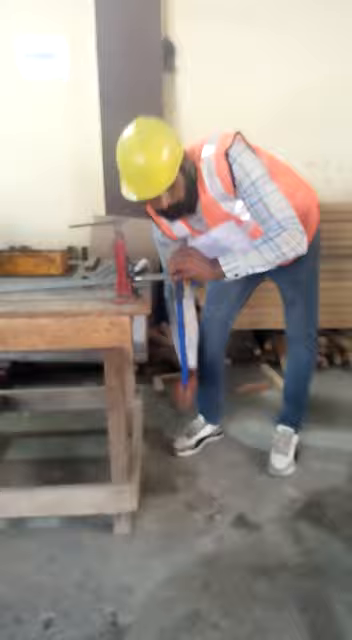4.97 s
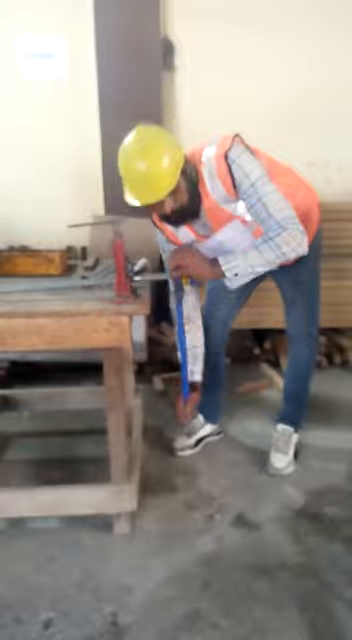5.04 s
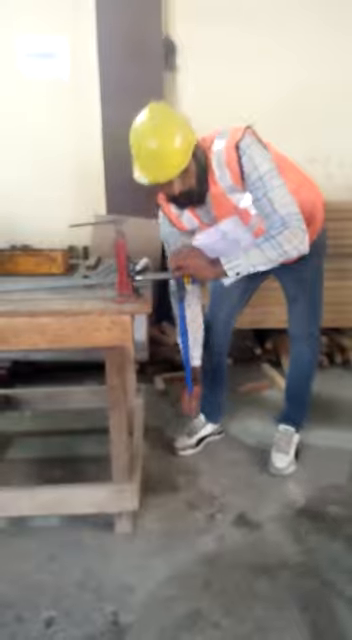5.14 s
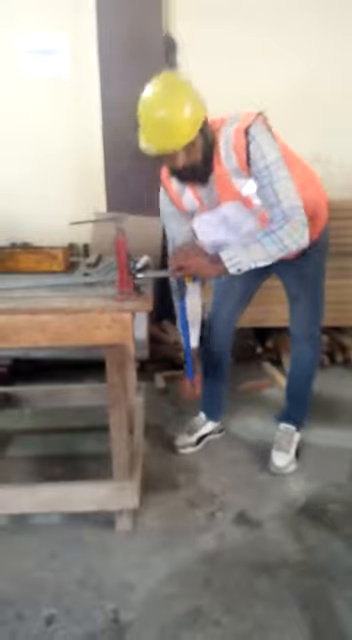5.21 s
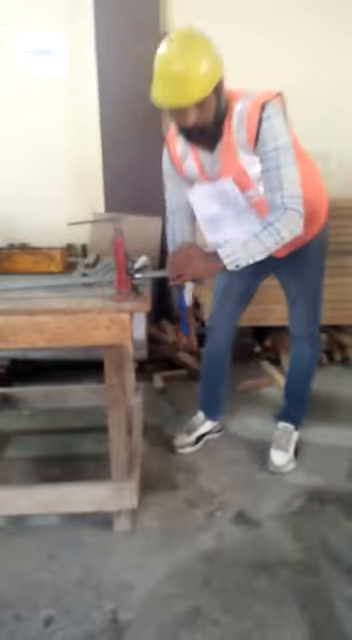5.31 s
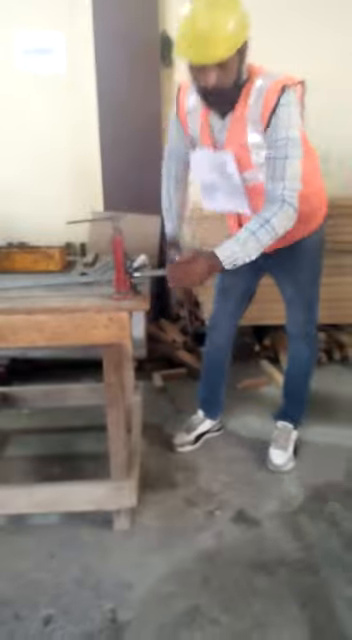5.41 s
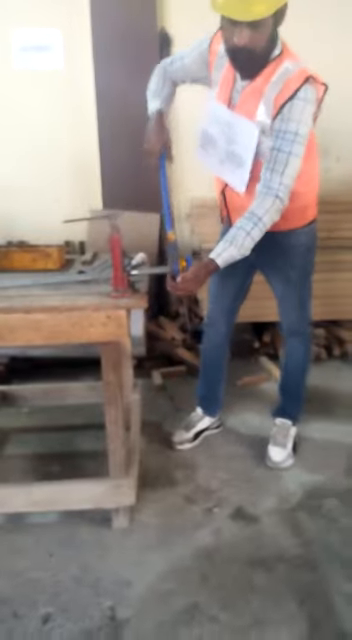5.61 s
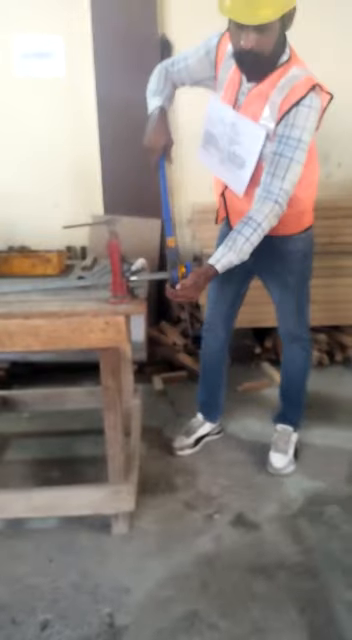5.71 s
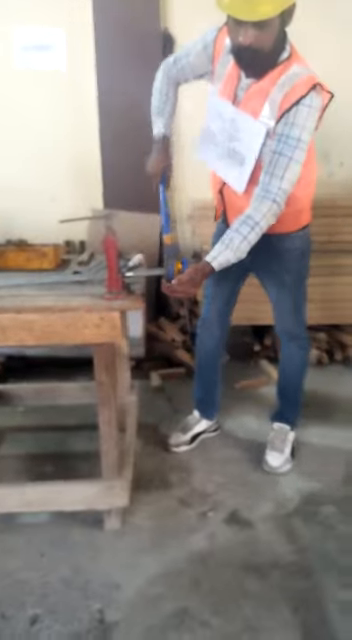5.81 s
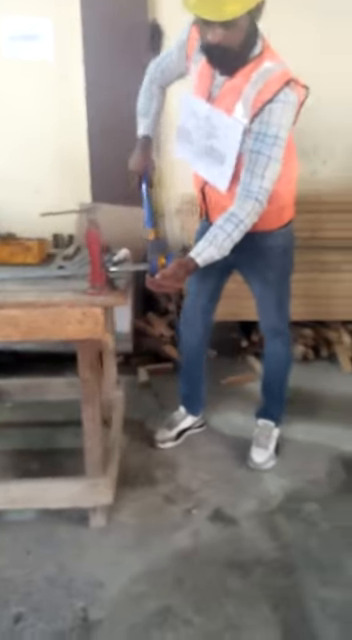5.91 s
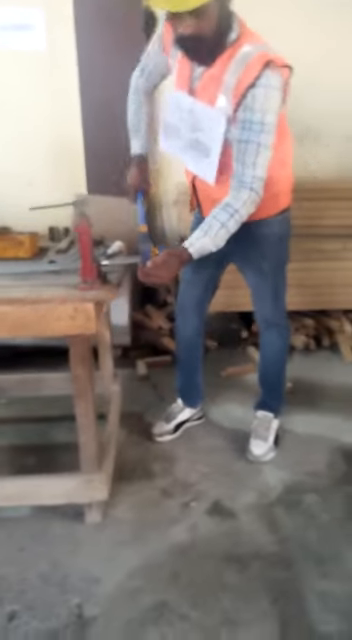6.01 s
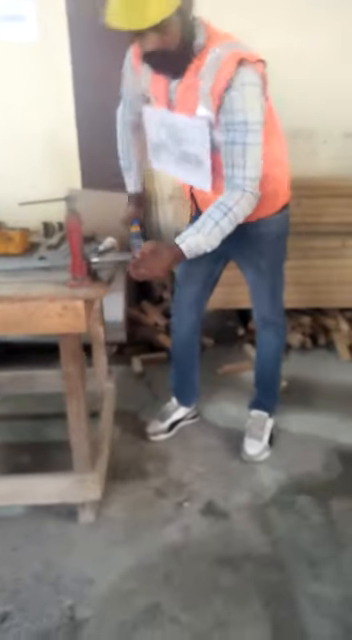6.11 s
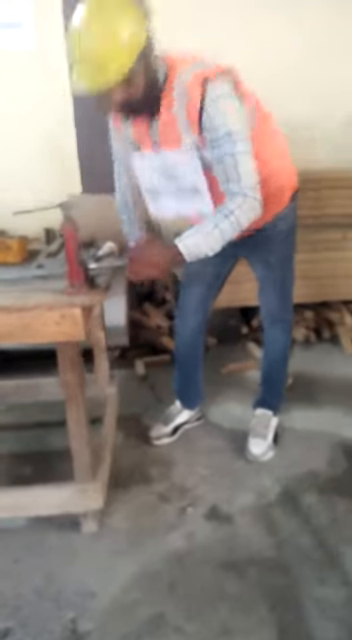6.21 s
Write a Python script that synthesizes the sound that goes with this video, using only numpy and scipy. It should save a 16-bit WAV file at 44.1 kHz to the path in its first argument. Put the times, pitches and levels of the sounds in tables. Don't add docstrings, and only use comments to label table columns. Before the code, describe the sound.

A hand ratchet die stock threads a clamped metal pipe in a hard, reverberant workshop, captured by a phone whose noise suppression leaves only a low, dull shop murmur. At 0 s a snap's echo fades; light ticks and a soft knock come at 0.25-0.35 s, then a faint rasp with chip hiss around 0.65-0.9. Four loud, crisp metal snaps fall at 1.16-1.46, a thin knock at 1.7, a faint cut at 2.05-2.35. Small creaks lead to four snaps at 2.62-2.95, a fuller knock at 3.13 and the longest, weakest rasp at 3.66-4.0. Three snaps follow at 4.12-4.3, ticks and a firm knock at 4.6-4.68, a short rasp at 4.95-5.2. Four final snaps sound at 5.45-5.76, then the heaviest, deepest knock at 5.94, with bench rumble fading. Snaps dominate; vise and pipe hum hollowly after every blow.

```python
import sys
import numpy as np
from scipy import signal
from scipy.fft import rfft, irfft, next_fast_len
from scipy.io import wavfile
from scipy.ndimage import uniform_filter1d

SR = 44100
rng = np.random.default_rng(int(sys.argv[2]) if len(sys.argv) > 2 else 0)


def inscribe(sig):
    pcm = np.round(np.clip(np.atleast_2d(sig).T, -1, 1) * 32767)
    wavfile.write(sys.argv[1], SR, pcm.astype(np.int16))


def to_linear_factor(level_db):
    exponent = np.asarray(level_db, float) / 20
    return 10 ** exponent


N = 276507

# [t/s, peak level/dB, low band/dB, high band/dB, middle band/dB]
SNAP_EVENTS = [(1.1573, -3, -0.5, -9, -13.5), (1.2441, -6, -5, -9, -18.5), (1.3423, -8.5, -12, -17, -21),
               (1.4551, -4.5, -11, -11, -15.5), (2.617, -8, -6.5, -9.5, -17),
               (2.7112, -6.5, -14.5, -10, -18.5), (2.8125, -6, -13.5, -11.5, -17.5),
               (2.9532, -6.5, -23.5, -16.5, -20.5), (4.1158, -4, -9, -13, -15.5),
               (4.2058, -4.5, -3.5, -12, -15), (4.2986, -8.5, -14, -12.5, -18.5),
               (5.4495, -2, -5, -15, -14), (5.5378, -7.5, -9, -8, -16), (5.6361, -8.5, -4.5, -6.5, -12),
               (5.7608, -4.5, -4, -8, -12)]
FIRST_SNAP = [(-.013, -8, -7, -9, -12)]
# [f/Hz, level per Hz/dB]
SHOP_SPECTRUM = [(45, 0.5), (95, 4), (320, 5), (1000, -3.5), (1600, -5), (2100, -13.5), (3200, -17),
                 (4200, -26), (6900, -30.5), (7500, -12), (8700, -12), (9900, -22.5), (10300, -29.5),
                 (14500, -37.5)]
# [f/Hz, attenuation/dB]
SUPPRESSION = [(250, 8), (1000, 11), (3000, 14)]
# [t/s, length/s, pitch of the dies over the usual/ratio]
STROKES = [
    (.65, .27, 1.003),
    (2.05, .3, .99),
    (3.66, .36, 1.02),
    (4.95, .25, 1.004),
]
PUSH_DB = [1.5, 0.5, -4, 1]


def unit(x):
    return x / np.sqrt(np.mean(x ** 2) + 1e-20)


def along(points, hz):
    f, v = np.transpose(points)
    return np.interp(np.log(hz + 1), np.log(f + 1), v)


def smooth(x, size):
    return uniform_filter1d(uniform_filter1d(x, size=size), size=size)


def noise(response):
    m = next_fast_len(N + 8192)
    spectrum = rfft(rng.standard_normal(m)) * response(np.fft.rfftfreq(m, 1 / SR))
    return unit(irfft(spectrum, m)[:N])


def causal(gain_db):
    cepstrum = irfft(gain_db * np.log(10) / 20)
    cepstrum[1:1024] *= 2
    cepstrum[1025:] = 0
    pulse = irfft(np.exp(rfft(cepstrum)))
    return pulse / np.linalg.norm(pulse)


def echo():
    # [f/Hz, t60/s]
    walls = [(1000, 0.64), (3000, 0.7), (7000, 0.71), (14000, 0.96)]
    hz, t, z = signal.stft(rng.standard_normal(SR * 2 // 3), SR, nperseg=256)
    decay = to_linear_factor(-60 * t / along(walls, hz)[:, None])
    tail = signal.istft(z * decay, SR, nperseg=256)[1]
    t = np.arange(len(tail)) / SR
    tail *= 1 - np.exp(-(t / 0.0065) ** 2)
    tail *= 1 + 1.5 * np.exp(-t / 0.014)
    return tail / np.linalg.norm(tail)


def blows(table, colour, gain_db, room_db, t60, bounce, bright_db, edge_hz=None):
    crack_t60_s, crack_share, mode_scatter_db = .0028, 2.3, 1.8
    out = np.zeros(N + 2 * SR)
    t, hz = np.arange(1024) / SR, np.fft.rfftfreq(2048, 1 / SR)
    usual = np.mean(table, axis=0)
    for s, db, low_db, high_db, wet_db, last in table:
        low_db, high_db = low_db - usual[2], high_db - usual[3]
        if edge_hz:
            lowest_hz, middle_db = edge_hz, last - usual[5]
        else:
            lowest_hz, middle_db = last, high_db / 2
        tilt = [(1500, low_db), (2400, 0.013), (3800, middle_db / 4), (5400, middle_db),
                (7200, high_db), (11000, high_db / 2)]
        modes_db = mode_scatter_db * unit(smooth(rng.standard_normal(len(hz)), 19))
        shape_db = along(colour, hz) + along(tilt, hz) + modes_db
        shape_db -= 10 * np.log10(1 + (lowest_hz / (hz + 50)) ** 24)
        shape_db += 5.5 * np.exp(-((hz - 7350) / 450) ** 2)

        envelope = to_linear_factor(-60 * t / t60) + crack_share * to_linear_factor(-60 * t / crack_t60_s)
        rattle = rng.standard_normal(len(t)) * envelope
        rattle[130:] += bounce * rattle[:-130]
        near_db = shape_db + bright_db * np.log2(hz / 3000 + 0.046)
        near_db += 6 * np.log2(hz / 9500 + .01).clip(0)
        direct = signal.fftconvolve(rattle / np.linalg.norm(rattle), causal(near_db))
        answer = to_linear_factor(room_db + wet_db) * signal.fftconvolve(echo(), causal(shape_db))

        out[round((s + .027) * SR) + SR // 2:][:len(direct)] += to_linear_factor(db + gain_db - 12) * direct
        for sound in (direct, answer):
            out[round(s * SR) + SR // 2:][:len(sound)] += to_linear_factor(db + gain_db) * sound
    return out[SR // 2:][:N]


def ratchet():
    # [t/s, peak level/dB, high band/dB, room/dB, lowest f/Hz]
    play = [(0.2511, -31.5, -1, 1.5, 2660), (0.3039, -28.5, -3, -2.5, 2050),
            (0.7948, -46.5, -3.5, -2.5, 7400), (1.0876, -33.5, 1.5, -2, 3320), (2.275, -52, 1.5, -15, 4800),
            (2.498, -47, -15.5, 2, 3400), (2.5529, -36, 6, -4, 4850), (3.9294, -58, 11, 10.5, 5480),
            (4.0526, -35.5, 4, -1.5, 3300), (4.08, -43.5, 9.5, -13, 5130), (4.102, -39.5, -9.5, 0, 1890),
            (4.625, -38, -4.5, 7, 3030), (4.6043, -30.5, 0, -1, 2310), (4.6441, -34.5, 11, -18.5, 3050),
            (5.3825, -35, 0.5, -2, 3180)]
    # [t/s, peak level/dB, low band/dB, high band/dB, lowest f/Hz]
    slack = [
        (0.3449, -25, -4.5, -1.5, 1980),
        (1.688, -24, 1, -4.5, 2000),
        (3.1303, -22, 1.5, -1, 1188),
        (4.676, -21, 3, 0.5, 1950),
        (5.9351, -18, 14.5, -2, 962),
    ]
    # [f/Hz, level per Hz/dB]
    pawl = [(410, -31), (700, 0), (861, -13), (1160, -33), (1290, 3), (1560, -3), (1950, 1.5), (2190, -3),
            (2830, -0.5), (3670, -3.5), (4460, -10), (6240, -12), (7190, -13), (8510, -16.5),
            (15400, -47.5)]
    # [f/Hz, level per Hz/dB]
    handle = [(1000, -19), (1900, -7), (2350, -0.5), (2620, 2.5), (2950, -5), (3600, -9.5), (4600, -18),
              (7500, -18), (10500, -28.5), (16000, -63.5)]
    snap_rows = [(s, db, low, high, -8 - 0.6 * db, middle)
                 for s, db, low, high, middle in list(FIRST_SNAP) + list(SNAP_EVENTS)]
    tick_rows = [(s, db, 0, *rest) for s, db, *rest in play]
    knock_rows = [(s, db, low, high, 0, lowest) for s, db, low, high, lowest in slack]
    snaps = blows(snap_rows, pawl, gain_db=14.5, room_db=4.5, t60=0.015, bounce=.55, bright_db=1.0, edge_hz=1150)
    ticks = blows(tick_rows, pawl, gain_db=23.0, room_db=0.0, t60=0.032, bounce=0.6, bright_db=1.2)
    knocks = blows(knock_rows, handle, gain_db=17.0, room_db=5.5, t60=0.013, bounce=0.37, bright_db=2.5)
    return snaps + ticks + knocks


def jolts():
    # [t/s, top/dB, vise/dB, pipe/dB, growth/(dB/s)]
    swings = [
        (-.1, -32.5, -32.5, -27, 8),
        (1.1, -35, -33, -37, 17.5),
        (2.549, -48, -42, -49, 29.5),
        (4.05, -44, -38, -33, 23.5),
        (5.4, -32.5, -31.5, -31.5, 2),
    ]
    # [t/s, legs/dB, top/dB, vise/dB, pipe/dB]
    thuds = [
        (0.347, -31, -37.5, -31, -41.5),
        (1.71, -65.5, -36, -41.5, -55),
        (3.138, -41.5, -32.5, -30.5, -32.5),
        (4.685, -41.5, -30.5, -27.5, -30),
        (5.938, -24, -28, -24.5, -34),
    ]
    # [t/s, level/dB, place from legs 0 to pipe 3, t60/s]
    nudges = [(.25, -43, 1.1, .3), (0.442, -39.5, .1, 0.36), (.985, -46.5, 0.92, .2),
              (1.04, -49.5, 1.95, 1), (1.09, -39.5, 2.05, 0.95), (1.13, -23, 1.5, 0.41),
              (1.37, -34, 0.89, .35), (1.55, -31, 1.74, 0.79), (1.62, -32, 1.97, 0.5), (2.63, -31, 1.1, .2),
              (2.72, -28.5, 2, .4), (2.82, -31, 2.0, 0.88), (2.975, -35.5, 2.4, 0.2), (1.785, -38, 1, 0.57),
              (1.92, -56, 1.2, 0.17), (1.95, -53, 0.047, 0.27), (2.489, -52.5, 1.2, 0.26),
              (2.58, -39.5, 2.4, 0.54), (3.23, -31, 1.7, .3), (4.0, -46, 1.8, 0.98),
              (4.601, -40.5, 2.2, .5), (4.78, -40, 6.4, 0.9), (5.285, -45, 2.4, 0.39),
              (5.294, -40.5, 0.061, 0.31), (5.348, -35.5, 1, 0.41), (5.389, -41, 2.7, 0.7),
              (6.04, -24.5, 0.35, .3), (6.09, -41, 1.4, .2), (6.15, -41, 0.75, 1)]
    snap_rise_s = [0.055, 0.0084, 0.0097, 0.013]
    snap_t60_s = [0.16, 0.43, 0.7, 0.56]
    thud_rise_s = [0.011, 0.016, 0.022, 0.016]
    thud_t60_s = [0.37, 0.5, 0.43, 0.52]
    reach_db, legs_under_top_db = 17, 24
    rows = [(s, db, thud_rise_s, thud_t60_s) for s, *db in thuds]
    for s, db, where, t60 in nudges:
        rows.append((s, db - reach_db * np.abs(np.arange(4) - where), [.014], [t60]))
    for s, *_ in list(FIRST_SNAP) + list(SNAP_EVENTS):
        start, top_db, vise_db, pipe_db, growth = [swing for swing in swings if swing[0] < s][-1]
        db = np.array([top_db - legs_under_top_db, top_db, vise_db, pipe_db]) + growth * (s - start)
        rows.append((s, db, snap_rise_s, snap_t60_s))
    return rows


def bench():
    # [f/Hz, bandwidth/Hz, level/dB]
    part_modes = [
        [(111, 43, -4.5), (172, 170, 3)],
        [(262.2, 22, -6), (314.9, 34, 0), (385.7, 25, -6)],
        [(455, 22, -25), (598, 350, 8), (689.7, 45, 5), (743.4, 78, 5.5)],
        [(936, 120, 3), (994.7, 94, 7), (1052.4, 45, 0), (1169, 60, 4)],
    ]

    def ring(modes):
        return noise(lambda f: sum(to_linear_factor(db) * (f * width / (centre ** 2 - f * f + 1j * f * width)) ** 2
                                   for centre, width, db in modes))

    parts = np.array([ring(modes) for modes in part_modes])
    power, t = np.zeros((4, N + 2 * SR)), np.arange(SR) / SR
    for s, db, rise, t60 in jolts():
        db, rise, t60 = (np.array(v)[:, None] for v in (db, rise, t60))
        envelope = to_linear_factor(db + 2 - 60 * t / t60) * (1 - np.exp(-(t / rise) ** 2))
        power[:, round(s * SR) + SR // 2:][:, :SR] += envelope ** 2
    return np.sum(np.sqrt(power[:, SR // 2:][:, :N]) * parts, axis=0)


def cut():
    # [f/Hz, level per Hz/dB]
    chips = [(1800, -27), (2400, -10.5), (3200, -22), (4400, -26.5), (5500, -23), (6500, -34),
             (9000, -21.5), (11000, -35), (13000, -55)]
    bite = .65
    rise_db_per_s, fall_db_per_s = 83.5, 97.5
    late = np.arange(N) / SR - np.array([[s + bite * length] for s, length, _ in STROKES])
    force_db = np.array(PUSH_DB)[:, None] + np.minimum(rise_db_per_s * late, -fall_db_per_s * late)
    grit_db = 0.83 * unit(uniform_filter1d(rng.standard_normal(N), size=300))
    level_db = np.maximum(force_db.max(axis=0), -20) - 57.0 + grit_db
    return to_linear_factor(level_db) * noise(lambda f: to_linear_factor(along(chips, f)))


def rubs():
    # [t/s, length/s, f/Hz, level/dB]
    creaks = [(0.98, 0.07, 460.0, -46), (1.01, 0.07, 3470.0, -65), (1.01, 0.1, 2560.0, -63),
              (1.12, 0.04, 2290.0, -56), (2.46, 0.06, 940.0, -55), (2.46, 0.14, 3780.0, -66),
              (2.49, 0.04, 2010.0, -55), (2.51, 0.06, 420.0, -52), (2.53, 0.05, 890.0, -54),
              (2.54, 0.06, 1890.0, -51), (4.0, 0.09, 2630.0, -65), (4.01, 0.08, 850.0, -44),
              (4.02, 0.03, 3600.0, -67), (4.02, 0.03, 4440.0, -69), (4.02, 0.08, 440.0, -46),
              (5.29, 0.03, 460.0, -43), (5.32, 0.03, 2430.0, -71), (5.34, 0.08, 920.0, -47),
              (5.35, 0.08, 3680.0, -58), (5.37, 0.07, 2680.0, -59)]
    # [t/s, length/s, f/Hz, level/dB]
    slips_and_rings = [(0.52, 0.1, 3230.0, -67), (0.8, 0.03, 1500.0, -58), (1.71, 0.04, 1450.0, -49),
                       (1.83, 0.05, 520.0, -45), (2.01, 0.1, 2400.0, -64), (2.14, 0.05, 790.0, -56),
                       (2.15, 0.06, 2040.0, -65), (2.26, 0.06, 2390.0, -64), (2.26, 0.08, 3820.0, -70),
                       (3.13, 0.1, 1380.0, -45), (3.3, 0.22, 910.0, -54), (3.5, 0.16, 880.0, -58),
                       (3.53, 0.05, 5530.0, -84), (3.78, 0.05, 780.0, -60), (4.5, 0.07, 2060.0, -55),
                       (4.61, 0.08, 740.0, -40), (4.62, 0.07, 1260.0, -46), (1.687, 0.035, 2550.0, -38),
                       (5.41, 0.08, 740.0, -41), (4.68, 0.17, 10960.0, -68), (3.94, 0.1, 5500.0, -76),
                       (3.86, 0.05, 6100.0, -82), (4.69, 0.2, 1520.0, -48), (1.8, 0.17, 2620.0, -58),
                       (6.22, 0.03, 1870.0, -66)]
    # [f/Hz, start/share of stroke, length/share of stroke, level at no extra force/dB]
    die_modes = [(2410, .3, .4, -65), (2930, .25, .42, -67), (4550, .33, .28, -78), (5390, 0, 1, -75),
                 (6020, .3, .5, -83)]
    rows = list(creaks) + list(slips_and_rings)
    for (s, length, pitch), force_db in zip(STROKES, PUSH_DB):
        for hz, start, share, db in die_modes:
            rows.append((s + start * length, share * length, hz * pitch, db + 1.8 * force_db + 0.1))
    return rows


def rasp():
    out = np.zeros(N + SR)
    for s, length, hz, db in rubs():
        t = np.arange(round(length * SR)) / SR
        drift = smooth(rng.standard_normal((2, SR // 2)), 350)[:, :len(t)]
        phase = 2 * np.pi * hz * t
        tone = unit(drift[0] * np.cos(phase) + drift[1] * np.sin(phase))
        level_db = max(db + 4.5, along(SHOP_SPECTRUM, hz) + along(SUPPRESSION, hz) - 63)
        swell = np.sin(np.pi * t / length).clip(0) ** 0.42
        out[round((s - .005) * SR):][:len(t)] += to_linear_factor(level_db + 2.0 - 5 * t / length) * tone * swell
    return out[:N]


def shop():
    leftover_db = -57
    return to_linear_factor(leftover_db + 9.5) * noise(lambda f: to_linear_factor(along(SHOP_SPECTRUM, f) + along(SUPPRESSION, f)))


def scene():
    return (ratchet() + bench() + rasp() + cut() + shop())[None]


def suppress(x, memory, margin_db):
    hz, _, z = signal.stft(x, SR, nperseg=512, noverlap=384)
    power = np.abs(z) ** 2
    floor = np.percentile(uniform_filter1d(power, 30, 1), 12, axis=1)
    usual = uniform_filter1d(floor, 3)
    ratio = uniform_filter1d(power, 4, 1) / (usual[:, None] * to_linear_factor(2 * margin_db))
    lowest_gain = to_linear_factor(-along(SUPPRESSION, hz))
    memory = np.clip(memory, 0, .995)
    gain, kept = np.ones(z.shape), ratio[:, 0]
    for k in range(z.shape[1]):
        prior = memory * kept + (1 - memory) * np.maximum(ratio[:, k] - 1, 0)
        gain[:, k] = np.maximum(prior / (1 + prior), lowest_gain)
        kept = gain[:, k] ** 2 * ratio[:, k]
    return signal.istft(z * gain, SR, nperseg=512, noverlap=384)[1][:N]


def roll_off(x):
    return signal.sosfilt(signal.butter(12, 15590, fs=SR, output="sos"), x)


def record(dry):
    clean = suppress(dry[0], memory=0.92, margin_db=0.5)
    clean = signal.sosfilt(signal.butter(3, 65, "high", fs=SR, output="sos"), clean)
    return roll_off(clean[None])


dry = scene()
out = record(dry)
inscribe(out)
```